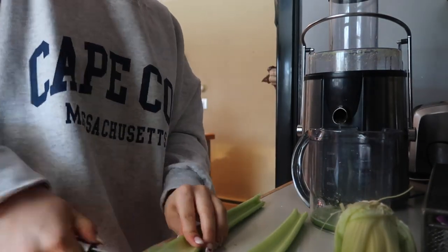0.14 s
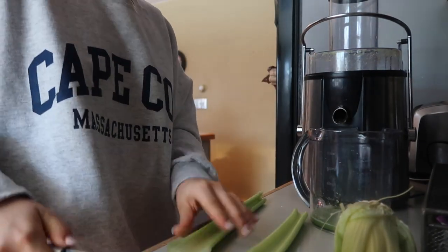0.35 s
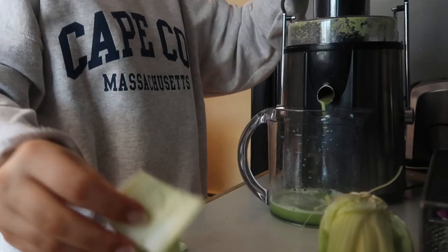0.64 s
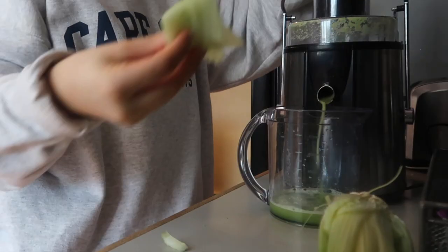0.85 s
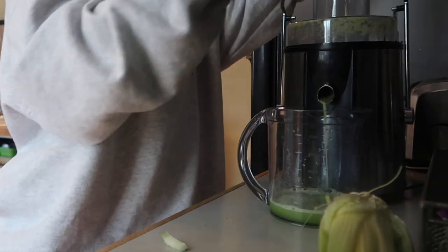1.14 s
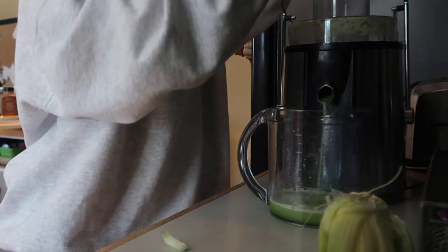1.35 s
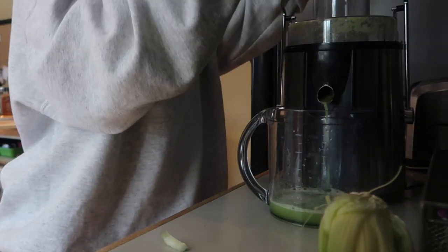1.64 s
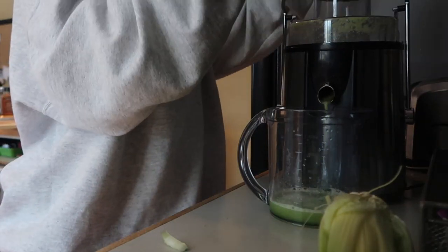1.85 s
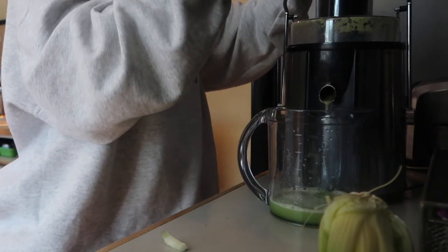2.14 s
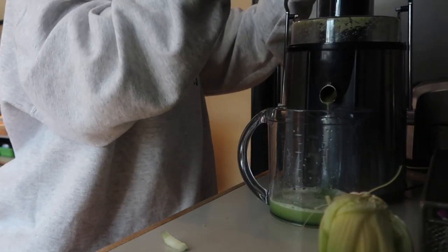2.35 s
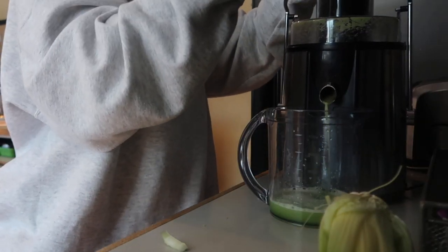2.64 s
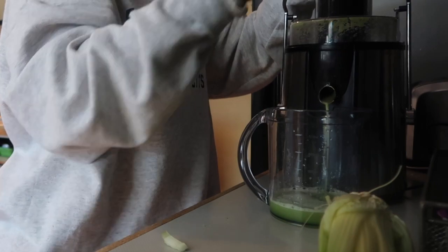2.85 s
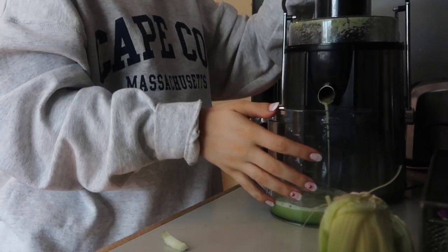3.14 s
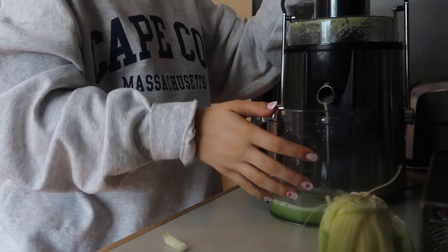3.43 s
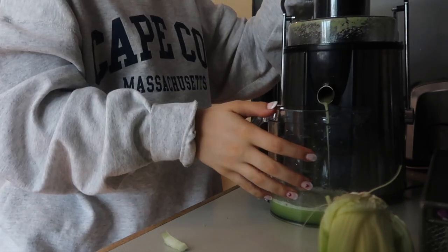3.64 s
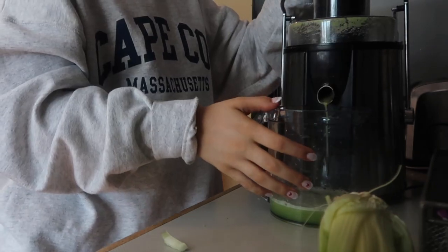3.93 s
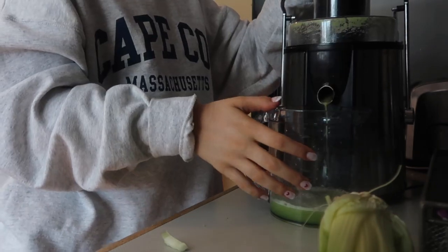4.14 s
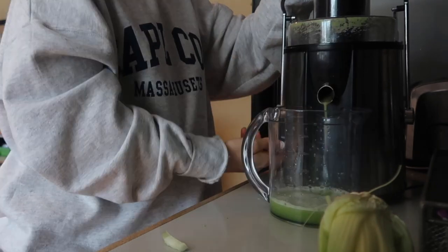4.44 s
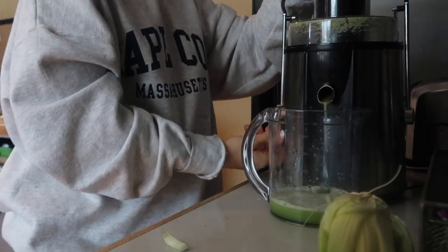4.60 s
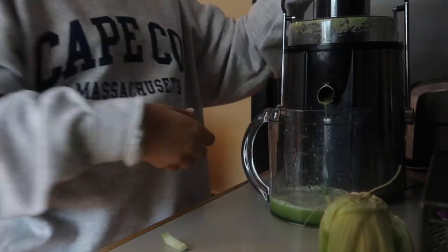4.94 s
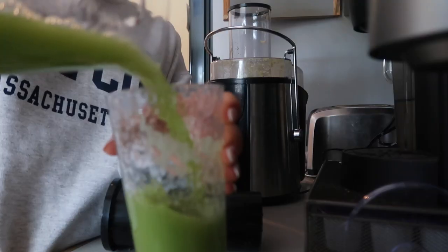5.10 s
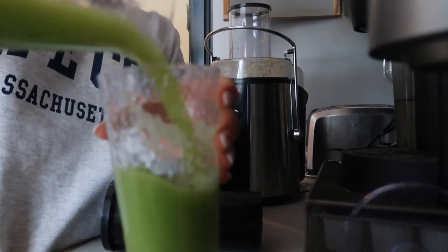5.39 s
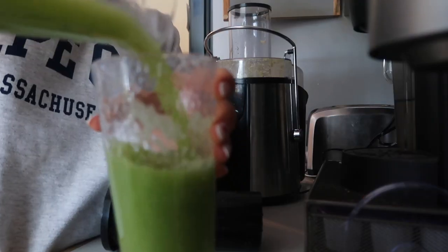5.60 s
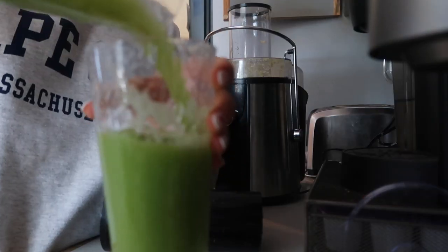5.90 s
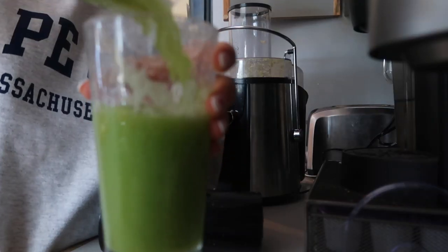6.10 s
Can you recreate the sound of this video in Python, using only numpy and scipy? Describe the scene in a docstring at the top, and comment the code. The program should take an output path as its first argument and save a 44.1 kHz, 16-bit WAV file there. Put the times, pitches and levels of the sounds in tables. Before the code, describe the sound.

Quick crunchy chops in a quiet kitchen cut to a grinding juicer with a dipping motor whine, then abruptly to soft pouring and ice clinks.

```python
"""A centrifugal juicer shreds celery: harmonic sines at multiples of twice the shaft speed make its whine,
flickering bands of noise its roar, and short noise bursts the clatter of pieces thrown in the basket.
Before it a knife chops the stalks, as band-passed bursts over crackling noise. After it juice is poured
over ice: struck and shaken glass modes, ringing bubbles and a gurgling air column over a low room hum."""
import sys
import numpy as np
from scipy import signal
from scipy.fft import rfft, irfft, next_fast_len
from scipy.io import wavfile
from scipy.ndimage import uniform_filter1d

SR = 44100
rng = np.random.default_rng(int(sys.argv[2]) if len(sys.argv) > 2 else 0)


def materialize(psi):
    """Save the field psi as 16-bit PCM at rate SR to the path in sys.argv[1].

    A 1-D psi becomes a single channel; in a 2-D psi each row is a channel.
    """
    bounded = np.clip(np.atleast_2d(psi).T, -1, 1)
    quanta = np.round(bounded * 32767).astype(np.int16)
    wavfile.write(sys.argv[1], SR, quanta)


N = 276066
TIME, SIZE = np.arange(N) / SR, next_fast_len(N + 4096)  # seconds, transform length in samples

# Span of the juicer: start_s, end_s
JUICER_SPAN = (.507, 5.142)

# Room before and after the juicer. Noise colours: frequency_hz, relative_level_db
QUIET_COLOUR = [(25, -16), (49, -41), (113, 6), (160, -18), (221, 5), (598, -19), (826, -16), (2560, -28),
                (4040, -26.5), (15500, -41)]
HUM_COLOUR = [(20, -18.5), (133, -1), (597, -18), (906, -30), (1630, -57), (2840, -24), (6910, -37),
              (13000, -55), (14500, -80)]
# Resonances of the hum: frequency_hz, width_hz, lift_db
HUM_RESONANCES = [(59.5, 17, 18.5), (131, 14, 10), (178, 13, 8.5), (466, 36, 10)]
QUIET_DB, HUM_DB = -60.5, -45.5
# Room air that differs between the ears: frequency_hz, relative_level_db
WIDE_AIR_COLOUR = [(40, -29), (145, -2), (373, 0), (2170, -16), (2450, -13), (6620, -24), (13300, -34),
                   (14500, -60)]
WIDE_BOARD_DB, WIDE_GLASS_DB = -74.5, -56
# Lateral reflections against the front, at the board and at the glass: frequency_hz, level_db
BOARD_REFLECTIONS = [(60, -52), (550, -13), (1650, -28), (6000, -18)]
GLASS_REFLECTIONS = [(60, -19), (550, -17), (1650, -38), (6000, -1.5), (10000, 0.5)]

# Ice striking glass and ice: start_s, relative_level_db, centre_hz
ICE_CLINKS = [(5.162, -24, 900), (5.201, -24, 2600), (5.217, -21, 2260), (5.248, -23.5, 3830),
              (5.29, -22, 3860), (5.315, -29, 1100), (5.375, -33, 3000), (5.384, -23, 2200),
              (5.412, -25, 2820), (5.43, -31, 5450), (5.448, -28, 3800), (5.475, -27, 3860),
              (5.495, -31, 3830), (5.531, -24.5, 3570), (5.54, -26, 1940), (5.5753, -15, 3300),
              (5.597, -35, 7100), (5.61, -32.5, 970), (5.626, -27.5, 6840), (5.651, -18.5, 2830),
              (5.688, -29.5, 4000), (5.71, -29, 2600), (5.765, -32.5, 2540), (5.775, -28, 2560),
              (5.796, -41, 3400), (5.83, -31.5, 2900), (5.862, -25, 3170), (5.881, -33, 2650),
              (5.9, -31, 4950), (5.929, -28.5, 980), (5.96, -27, 3900), (5.973, -28, 3800),
              (5.996, -32, 1450), (6.015, -34, 2860), (6.04, -39, 6360), (6.063, -31, 2860),
              (6.067, -24.5, 1123), (6.098, -33.5, 1100), (6.115, -35, 4750), (6.13, -36, 1550),
              (6.174, -35.5, 3900), (6.233, -39, 2920)]
# Modes of the glass with ice: frequency_hz, relative_level_db, t60_s
GLASS_MODES = [(900, 5.5, 0.1), (1105, 2, 0.11), (1460, -2.5, 0.11), (1813, -2.5, 0.1), (2160, -4, 0.027),
               (2500, -5.5, 0.051), (2640, 5.5, 0.074), (2830, 1, 0.08), (3300, -13, 0.016),
               (3935, 4.5, 0.03), (3930, -10, 0.099), (4830, -22, 0.025), (5720, -11, 0.03),
               (7000, -18, 0.024)]
# Level of the trickling stream: time_s, relative_level_db
POUR_LEVEL = [(5.15, -40), (5.6, -52), (5.9, -52.5), (6.12, -58), (6.26, -56)]
# Colour of the trickle: frequency_hz, relative_level_db
TRICKLE_COLOUR = [(290, -31), (782, -13), (904, 1.5), (1600, -13), (2850, -0.5), (3220, 0), (9000, -25.5),
                  (13000, -41), (15000, -77)]
# Air above the juice, rising in pitch as the glass fills: time_s, pitch_hz
AIR_COLUMN = [(5.14, 824), (5.5, 957), (6.26, 1053)]
WASH_S = 0.024  # decay time constant of the slosh after a cube moves

# Knife through the stalks onto the board: start_s, relative_level_db, centre_hz, width_octaves
KNIFE_BLOWS = [(0.017, -42, 900, 0.76), (0.0382, -28.5, 810, 0.85), (0.04, -34, 4000, 2.9),
               (.058, -25.5, 2630, 1.3), (.0905, -33, 1730, 1.8), (0.101, -33, 2500, 4),
               (0.108, -29.5, 960, 1.25), (.1312, -24, 3300, 1.3), (0.148, -37, 4100, 0.8),
               (.158, -39, 4300, 1.1), (.171, -49, 4100, 0.43), (.226, -52, 800, 0.38),
               (0.4, -46, 1480, 1.1), (.42, -44, 3400, .3)]
CHOP_T60_S = 0.032
# Fibres tearing as the blade goes through or slides: peak_s, relative_level_db
FIBRE_TEARS = [(0.042, -41), (0.105, -38.5), (0.135, -39.5), (0.154, -60), (.258, -62), (0.368, -56),
               (0.4, -49.5)]
TEAR_RISE_DB_PER_S, TEAR_FALL_DB_PER_S = 2403, 500
# Colour of the tearing stalk: frequency_hz, relative_level_db
STALK_COLOUR = [(88, -38), (150, -7), (404, -7), (453, -15), (1020, -5), (1830, -15), (2230, -9),
                (15500, -20.5)]
# Resonances of the blade: frequency_hz, width_hz, lift_db
BLADE_RESONANCES = [(780, 140, 4), (3470, 400, 7), (4100, 450, 10), (7000, 450, 7)]

# Juicer level: time_s, relative_level_db, drone_db (its mean is removed in use)
ROAR_LEVEL = [(.5, -44.5, 0.5), (1.2, -42.5, -5), (1.8, -45.5, -1.5), (1.95, -41, -4.5), (2.5, -45.5, -2),
              (2.9, -48, -1.5), (3.8, -45, 0), (4.2, -44.5, -2), (4.5, -42.5, -3), (4.8, -40.5, -6),
              (5.14, -46, -2.5)]
# Centres of the drone, tube and steady regions of the roar: frequency_hz
ROAR_REGIONS = (240, 780, 1150)
# Colour of the fan and basket noise: frequency_hz, relative_level_db
ROAR_COLOUR = [(30, -42), (141, -15.5), (232, 0.5), (435, -9.5), (537, -9.5), (716, -3.5), (1660, -8),
               (2210, -14.5), (2520, -6), (3030, -14.5), (3280, -8.5), (4040, -8), (6150, -12),
               (15800, -17.5)]
# Resonances of the housing, dips negative: frequency_hz, width_hz, lift_db
HOUSING_RESONANCES = [(231.7, 2.9, 8), (329, 130, 7), (549, 60, -21.5), (818, 34, -9), (1100, 12, 8.5),
                      (2650, 1760, 3.5), (3280, 66, 8.5), (4880, 120, 8), (6010, 730, 7.5), (7940, 230, 5)]
# Stalks ground in the feed tube: start_s, length_s, tube_change_db (its mean is removed in use)
TUBE_GRINDS = [(1.186, 0.68, 5.5), (4.952, .3, -0.5)]
GRIND_EDGE_S, TUBE_HZ = 0.084, 800  # fade of a grind, resonance of the feed tube
# Pieces against basket and lid: start_s, relative_level_db, centre_hz, width_octaves, dip_depth_db
BASKET_CLATTER = [(0.835, -27.5, 6400, 0.96, 6), (1.517, -26.5, 6500, 3, 3.5),
                  (1.602, -26.5, 905, 0.62, -1), (1.691, -30, 296, 1.1, -1), (1.781, -33, 6000, 1.8, 2),
                  (1.898, -28, 6800, 1.17, 7), (2.0243, -24, 3300, 0.39, 7),
                  (2.2325, -25.5, 5430, 2.9, 4.5), (2.628, -29.5, 6450, 1.1, 1.5),
                  (3.197, -32.5, 989, 1.6, 0.5), (3.871, -34, 10940, 1.3, 4.5),
                  (3.907, -28.5, 7000, 0.81, 3), (4.037, -32, 7720, 0.58, 4),
                  (4.2499, -32.5, 1271, 0.61, 1), (4.5291, -39, 7000, 1.9, 4), (4.7868, -33, 5040, 1.13, 7)]

# Motor pitch, twice the shaft speed, dragged down by pushes on the stalks: time_s, pitch_hz, upper_lines_db
MOTOR_SPEED = [(.5, 457, 1.5), (.95, 462, 0), (1.45, 464.7, 0), (1.6, 460.8, -2), (2.05, 458, -3),
               (2.2, 458.5, -14), (2.27, 425, -3), (2.53, 408, 2), (2.63, 404, 3), (2.67, 402, -2),
               (2.8, 399.6, 4), (2.92, 393, 3.5), (3.02, 396.5, 2.5), (3.12, 398.3, 3.5), (3.3, 408.9, 4),
               (3.7, 424, -0.5), (4.15, 427.6, 0), (4.3, 434, 4), (4.5, 438.7, 1), (4.74, 441.7, 1),
               (4.96, 398, 3), (5.13, 352, 7)]
FREE_HZ, LOAD_HZ = 457, 27  # pitch below which the motor is loaded, drop to full load
# Lines of the whine, relative to the juicer level: multiple, free_db, loaded_db
WHINE_LINES = [(1, -9, -6), (2, -12.5, -13.5), (3, -15, -10), (4, -14, -6), (5, -15.5, -17),
               (6, -15, -16.5), (7, -35, -18), (8, -13.5, -11), (9, -22, -22.5), (10, -25, -17.5),
               (11, -30, -21), (12, -11.5, -2.5), (14, -22, -14), (15, -40, -9.5), (16, -36, -14),
               (20, -40, -14), (21, -38, -17), (22, -37, -23), (24, -23, -14), (26, -40, -19),
               (36, -40, -17)]
# Lines shifted by the ripple, same reference: multiple, ripples_added, free_db, loaded_db
RIPPLE_LINES = [(0, 1, -14, -13), (1, -1, -27, -27), (12, -1, -27, -8)]
RIPPLE_HZ = 239  # mains ripple of the motor torque
# Resonances of the motor mount, dips negative: frequency_hz, width_hz, lift_db
MOUNT_RESONANCES = [(157.7, 8, 11), (373.5, 71, 7), (752.6, 30, 3), (950.4, 86, 16), (1600, 39, 2.5),
                    (2802, 30, 2.5), (4732, 260, 10.5), (4980, 49, -18), (5092, 72, 6.5), (10900, 150, 9)]
# Single lines swelling or fading for a while: multiple, centre_s, half_length_s, change_db
LINE_SWELLS = [(6, .65, .15, 6), (4, 1.33, .25, 8), (24, 1.8, .25, 6), (24, 2.47, .1, 12),
               (6, 2.54, .09, 12), (7, 2.88, .2, 13), (1, 2.85, .25, 3), (9, 2.76, .11, 15),
               (11, 2.95, .17, 15), (4, 2.97, .06, -12), (6, 3.11, .08, 11), (10, 3.2, .27, 12),
               (7, 3.43, .07, 9), (6, 3.45, .08, 10), (5, 3.45, .12, 9), (2, 3.65, .2, 6),
               (14, 3.68, .17, 12), (22, 3.9, .15, 8), (4, 3.95, .15, -8), (20, 4.2, .25, 8),
               (10, 4.45, .17, 11), (24, 3.15, .3, 5), (12, 4.6, .3, -10), (2, 5.04, .12, 7),
               (12, 5.03, .16, -7)]
WAVER_DB = 1.3  # slow waver of a line, multiplied on high ones

# Two microphone ports: frequency_hz, likeness_0_to_1, left_lead_rad, left_minus_right_db
PORT_DIFFERENCES = [(30, 1, 0, 0), (5500, 1, 0, 0), (6400, 0.995, 0.03, -0.1), (7500, 0.98, .05, -2.5),
                    (8100, 0.68, 0.83, -1), (9600, 0.5, 0.85, -2.5), (13000, 0.7, 2.04, -1)]
CUTOFF_HZ = 16000


def amp(db):
    """Decibels are 20 times the base-ten logarithm of an amplitude ratio."""
    return 10 ** (np.asarray(db) / 20)


def rms_one(x):
    """Normalise to unit mean power."""
    return x / np.sqrt(np.mean(x ** 2) + 1e-20)


def in_time(rows):
    """Linear interpolation gives each column of a curve at every sample."""
    s, *columns = np.transpose(rows)
    return [np.interp(TIME, s, column) for column in columns]


def at_hz(points, hz):
    """Interpolate a spectrum on a logarithmic frequency axis."""
    points = np.array(points)
    return np.interp(np.log(hz), np.log(points[:, 0]), points[:, 1])


def bins_hz():
    """A discrete spectrum has evenly spaced frequencies; the lowest is raised to 1 Hz for logarithms."""
    return np.maximum(np.arange(SIZE // 2 + 1) * SR / SIZE, 1)


def peaks_db(modes, hz):
    """Resonances are Lorentzian lifts, summed in decibels."""
    return sum(lift / (1 + (2 * (hz - centre) / width) ** 2) for centre, width, lift in modes)


def drift(rate):
    """Low-pass filtered white noise wanders slowly, with unit rms and a corner at rate Hz."""
    step = 40  # samples between drawn values
    r = np.exp(-2 * np.pi * step * rate / SR)
    white = rng.standard_normal(N // step + 2002)
    slow = signal.lfilter([1], [1, -2 * r, r * r], white)[2000:]  # skip the filter's start
    return np.interp(np.arange(N) / step, np.arange(len(slow)), rms_one(slow))


def coloured(spectrum, modes=(), source=None):
    """Filtering white noise shapes its spectrum; returns bins for unit rms, and their octaves."""
    hz = bins_hz()
    white = rng.standard_normal(N) * (1 if source is None else source)
    shaped = rfft(white, SIZE) * amp(at_hz(spectrum, hz) + peaks_db(modes, hz))
    return shaped / np.std(irfft(shaped, SIZE)[:N]), np.log2(hz)


def noise(spectrum, modes=(), source=None):
    """The inverse transform turns a coloured spectrum into sound."""
    return irfft(coloured(spectrum, modes, source)[0], SIZE)[:N]


def grains(per_s, spread_db):
    """Sparse random gains on a faint bed make noise crackle."""
    struck = rng.random(N) < per_s / SR
    return 0.085 + struck * amp(spread_db * np.minimum(rng.exponential(1, N), 4))


def ring(clicks, hz, t60):
    """A two-pole resonator answers a unit click with a decaying sine that starts from unit height."""
    r, w = amp(-60 / (t60 * SR)), 2 * np.pi * hz / SR
    return signal.lfilter([0, np.sin(w)], [1, -2 * r * np.cos(w), r * r], clicks + 1e-18)


def bursts(events, rise_s, snap):
    """An impact excites an impulse and an exponentially decaying noise in a limited band."""
    out, t = np.zeros(N + 8192), np.arange(8192) / SR
    whites = rng.standard_normal((len(events), len(t)))
    for (s, db, hz, width, t60), white in zip(events, whites):
        edges = np.clip(hz * 2 ** (np.array([-.5, .5]) * width), 50, .45 * SR)
        puff = white * (1 - np.exp(-t / rise_s)) * amp(-60 * t / t60) + snap * (t == 0)
        puff = signal.sosfilt(signal.butter(3, edges, "band", fs=SR, output="sos"), puff)
        loudest = np.max(uniform_filter1d(puff ** 2, size=88))  # mean power over 2 ms
        out[round(s * SR):][:len(t)] += amp(db) * puff / np.sqrt(loudest * 4)
    return out[:N]


def quiet_room():
    """Stationary coloured noise forms the background of the chopping."""
    return amp(QUIET_DB) * noise(QUIET_COLOUR)


def room_hum():
    """Resonances concentrate slowly wavering low noise into a hum."""
    return amp(HUM_DB + 1.0 * drift(2.7)) * noise(HUM_COLOUR, HUM_RESONANCES)


def widened(x, side_db, air_db):
    """Lateral reflections and room air reach the two ears in opposite phase."""
    echoes = rng.standard_normal(2000) * np.exp(-np.arange(2000) / SR / .01)
    echoes = rfft(echoes / np.linalg.norm(echoes), SIZE)
    side = irfft(rfft(x, SIZE) * echoes * amp(at_hz(side_db, bins_hz())), SIZE)[:N]
    return x + (side + amp(air_db) * noise(WIDE_AIR_COLOUR)) * [[1], [-1]]


def bubbles():
    """Each bubble between the cubes is a damped oscillator of its own pitch; births come in clumps."""
    born = rng.random(N) < 1500 * amp(3.5 * drift(14)) / SR
    sizes = born * amp(3.3 * np.minimum(rng.exponential(1, N), 4)) * rng.choice([-1, 1], N)
    pitches, dealt = np.geomspace(750, 7500, 48), rng.integers(0, 48, N)
    cycles = 55  # until 60 dB down
    out = 0
    for k, hz in enumerate(pitches):
        rung = ring(sizes * (dealt == k), hz, cycles / hz)
        out = out + amp(at_hz(TRICKLE_COLOUR, hz)) * np.sqrt(hz) * rung
    return rms_one(out)


def gurgle():
    """The stream excites the air column: a narrow tone sounds in fits and wobbles in pitch."""
    hz = in_time(AIR_COLUMN)[0] * (1 + 0.055 * drift(11))
    fits = drift(49) * amp(7.9 * drift(11))
    return rms_one(fits * np.sin(2 * np.pi * np.cumsum(hz) / SR))


def splash():
    """Random forcing by the stream excites every mode of the glass in fits of its own."""
    out = 0
    for hz, db, t60 in GLASS_MODES:
        mode = rms_one(ring(rng.standard_normal(N), hz, 0.8 * t60))
        out = out + amp(db + 6 * drift(30)) * mode
    return rms_one(out)


def wash():
    """Energy decays exponentially: every clink throws up juice that settles again."""
    s, db, _ = np.transpose(ICE_CLINKS)
    kicks = np.zeros(N)
    kicks[np.round(s * SR).astype(int)] = amp(0.6 * db)  # small clinks slosh more than their share
    return signal.lfilter([1], [1, -np.exp(-1 / (WASH_S * SR))], kicks)


def plops():
    """A damped oscillation at each clink's centre rises a little in pitch as it dies."""
    out, t = np.zeros(N + 4096), np.arange(4096) / SR
    for s, db, hz in ICE_CLINKS:
        shape = (1 - np.exp(-t / 0.001)) * amp(-60 * t * hz / 55.0)  # 55 cycles to 60 dB down
        out[round(s * SR):][:len(t)] += amp(db - 8.0) * shape * np.sin(2 * np.pi * hz * (t + 1.0 * t ** 2))
    return out[:N]


def clinks():
    """Modal excitation: a crack and a rattle of touches strike hardest the modes near each centre."""
    s, db, centre = np.transpose(ICE_CLINKS)
    cracks = [(*row, .4, .014) for row in ICE_CLINKS]  # width in octaves, t60 in s
    out = amp(-8.5) * bursts(cracks, rise_s=0.0005, snap=4.0) + plops()
    chance_db = rng.normal(0, 3, (len(s), len(GLASS_MODES)))
    touch = np.arange(600) / SR
    rattle = (1 - np.exp(-touch / 0.00069)) * np.exp(-touch / 0.0025)
    for k, (hz, level_db, ring_s) in enumerate(GLASS_MODES):
        detuning_db = -26.0 * np.log2(hz / centre) ** 2
        strength = np.zeros(N)
        strength[np.round(s * SR).astype(int)] = amp(db + level_db - 35.0 + chance_db[:, k] + detuning_db)
        touches = signal.fftconvolve(strength, rattle)[:N] * rng.standard_normal(N)
        out += ring(touches, hz, ring_s)
    return out


def pouring():
    """Superposition of clinks, bubbles, gurgle, splash, slosh and the hum of the room."""
    stream = amp(-4.0) * bubbles() + amp(-9.0) * gurgle()
    trickle = amp(4.0 * drift(36) - 36.5) * noise(TRICKLE_COLOUR)
    slosh = wash() * (trickle + amp(-35.0) * splash())
    return clinks() + amp(in_time(POUR_LEVEL)[0]) * stream + slosh + room_hum()


def tearing_fibres():
    """Brittle fracture is a train of small random pulses, here filtered by stalk and blade."""
    tearing = 0
    for s, db in FIBRE_TEARS:
        fall_db = np.maximum(TEAR_RISE_DB_PER_S * (s - TIME), TEAR_FALL_DB_PER_S * (TIME - s))
        tearing = tearing + amp(db - fall_db)
    return tearing * noise(STALK_COLOUR, BLADE_RESONANCES, grains(per_s=6000, spread_db=1.5))


def chopping():
    """Impacts of the knife superpose on the crackle of fibres and a quiet room."""
    blows = bursts([(*row, CHOP_T60_S) for row in KNIFE_BLOWS], rise_s=0.00022, snap=9.0)
    return blows + tearing_fibres() + quiet_room()


def clatter():
    """Pieces striking basket and lid excite short bands of noise."""
    return bursts([(*row[:4], .05) for row in BASKET_CLATTER], rise_s=0.00085, snap=0)


def clatter_dip_db():
    """Exponential recovery: the level shifts after each clatter, mostly down, and slowly returns."""
    dip_db = np.zeros(N)
    for s, _, _, _, depth_db in BASKET_CLATTER:
        since = np.maximum(TIME - s - .008, 0)
        dip_db += depth_db * (1 - np.exp(-since / 0.01)) * np.exp(-since / 0.2)
    return dip_db


def grinding_db():
    """Grinding shifts the level of the feed tube between ramped edges."""
    tube_db = 0
    for s, length, change_db in TUBE_GRINDS:
        inside_s = np.minimum(TIME - s, s + length - TIME)
        tube_db = tube_db + change_db * np.clip(inside_s / GRIND_EDGE_S + .5, 0, 1)
    return tube_db


def roar(roar_db, *over_db):
    """Housing resonances filter fan and basket noise; half-octave bands flicker partly together."""
    shaped, octave = coloured(ROAR_COLOUR, HOUSING_RESONANCES)
    running = slice(round(.6 * SR), round(5.1 * SR))
    drone, tube = (db - db[running].mean() for db in over_db)
    # drone, tube and steady regions
    moves = np.array([drone + 1.03 * drift(4.9), tube + 1.2 * drift(2.7), np.zeros(N)])
    out, together = 0, drift(5.8)
    for centre in np.arange(4, 15, .5):  # octaves above 1 Hz
        band = np.cos(np.pi * np.clip(octave - centre, -.5, .5)) ** 2
        shares = [np.interp(centre, np.log2(ROAR_REGIONS), row) for row in np.eye(len(moves))]
        flicker_db = shares @ moves + 1.0 * together + 1.5 * drift(22.4)
        out = out + irfft(shaped * band, SIZE)[:N] * amp(flicker_db)
    growl = rms_one(ring(rng.standard_normal(N), TUBE_HZ, 0.21))  # resonant air in the feed tube
    return amp(roar_db + 7.5) * (out + amp(5.3 * tube + 1.9 * drift(25) - 33.5) * growl)


def whine(roar_db):
    """Harmonics of the motor pitch, with ripple lines beside some and a steady 239 Hz tone, shift with load."""
    pitch, upper_db = in_time(MOTOR_SPEED)
    pitch = uniform_filter1d(pitch, size=1500)
    turn = 2 * np.pi * np.cumsum(pitch * (1 + 0.00085 * drift(15.0))) / SR
    load = np.clip((FREE_HZ - pitch) / LOAD_HZ, 0, 1)
    pitch_change = np.abs(np.gradient(pitch)) * SR  # Hz per second
    # lines above multiple 2 weaken while the pitch changes fast
    blur_db = .045 * uniform_filter1d(pitch_change, size=4000)
    out = 0
    for multiple, ripples, free_db, loaded_db in RIPPLE_LINES + [(m, 0, *db) for m, *db in WHINE_LINES]:
        ripple_hz = ripples * RIPPLE_HZ
        hz = (multiple * pitch + ripple_hz)[::40]
        lift_db = 0.4 * peaks_db(HOUSING_RESONANCES, hz) + peaks_db(MOUNT_RESONANCES, hz)
        level_db = roar_db + free_db + load * (loaded_db - free_db) + np.repeat(lift_db, 40)[:N]
        level_db += WAVER_DB * (1 + multiple // 18) * drift(4.1) + 1.14 * drift(65)
        level_db += upper_db * (multiple > 1) - blur_db * (multiple > 2)
        for line, s, half_s, db in LINE_SWELLS:
            if line == multiple:
                level_db += db * np.exp(-((TIME - s) / half_s) ** 4)
        phase = multiple * turn + 2 * np.pi * (ripple_hz * TIME + rng.random())
        out = out + amp(level_db) * np.sin(phase)
    return np.sqrt(2) * out


def juicer():
    """Superposition of whine and roar, which share the dips, and of the clatter."""
    roar_db, drone_db = in_time(ROAR_LEVEL)
    running = whine(roar_db) + roar(roar_db, drone_db, grinding_db())
    return amp(-clatter_dip_db()) * running + clatter()


def scene():
    """Complementary gains join chopping, juicer and pouring by crossfades of 6.9 ms."""
    first, second = (np.clip((TIME - s) / 0.0069 + .5, 0, 1) for s in JUICER_SPAN)
    board = widened(chopping(), BOARD_REFLECTIONS, WIDE_BOARD_DB)
    glass = widened(pouring(), GLASS_REFLECTIONS, WIDE_GLASS_DB)
    return (1 - first) * board + (first - second) * juicer() + second * glass


def record(dry):
    """Coherence of two close ports falls in the treble, by phase and scattering; a low-pass cuts the top."""
    hz = bins_hz()
    alike, lead, lean_db = (at_hz(np.array(PORT_DIFFERENCES)[:, [0, k]], hz) for k in range(1, 4))
    alike = np.clip(alike, 0, 1)
    scatter = rng.standard_normal(4000) * np.exp(-np.arange(4000) / SR / .03)
    scatter = rfft(scatter / np.linalg.norm(scatter), SIZE)  # many close reflections
    common, differing = np.sqrt((1 + alike) / 2), np.sqrt((1 - alike) / 2) * scatter
    ports = [amp(side * lean_db / 2) * np.exp(.5j * side * lead) * (common + side * differing)
             for side in (1, -1)]
    heard = irfft(rfft(dry, SIZE) * ports, SIZE)[:, :N]
    return signal.sosfilt(signal.cheby2(20, 80, CUTOFF_HZ, fs=SR, output="sos"), heard)


dry = scene()
out = record(dry)
materialize(out)
```